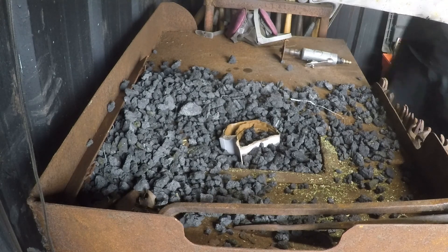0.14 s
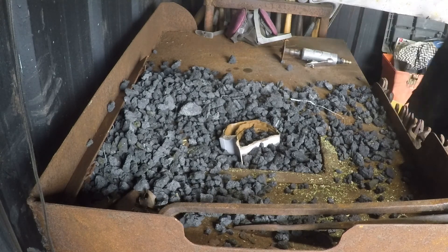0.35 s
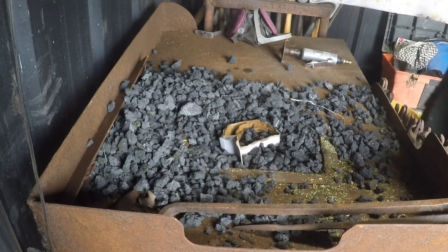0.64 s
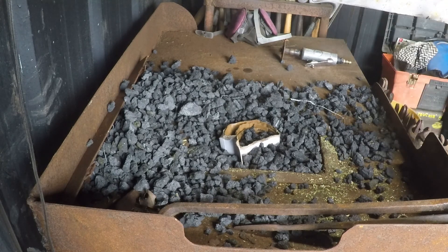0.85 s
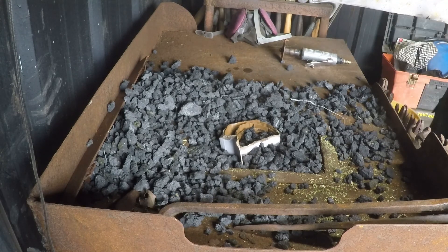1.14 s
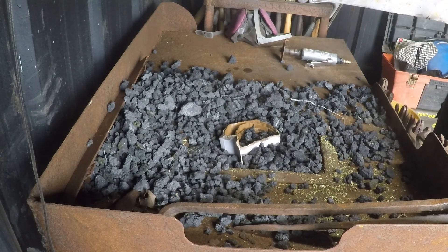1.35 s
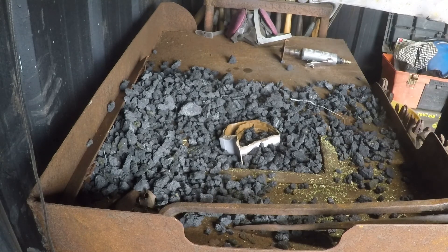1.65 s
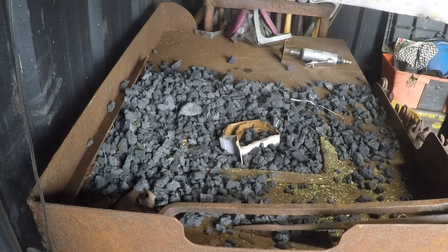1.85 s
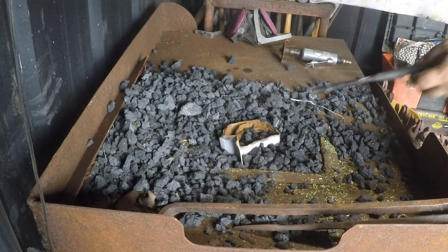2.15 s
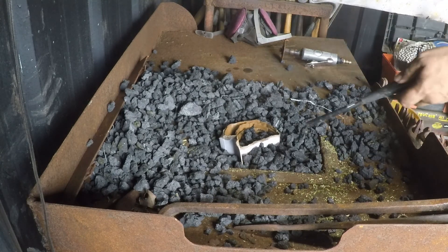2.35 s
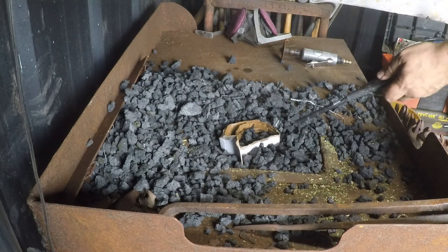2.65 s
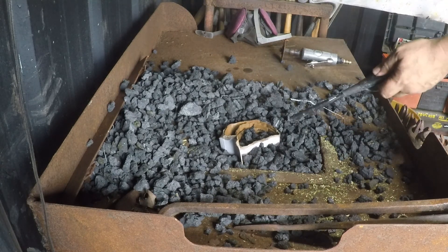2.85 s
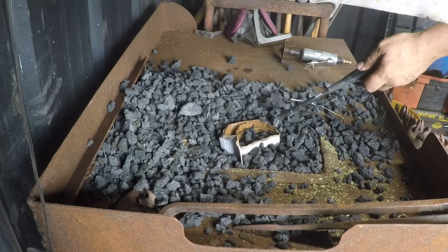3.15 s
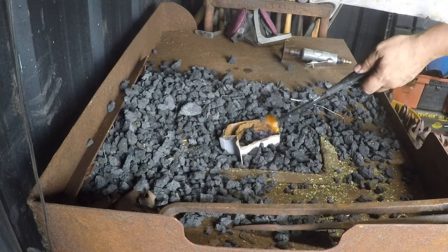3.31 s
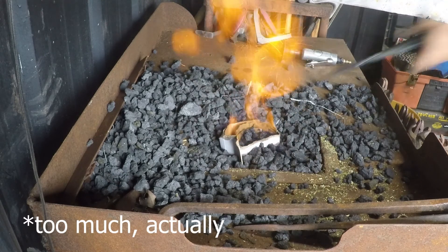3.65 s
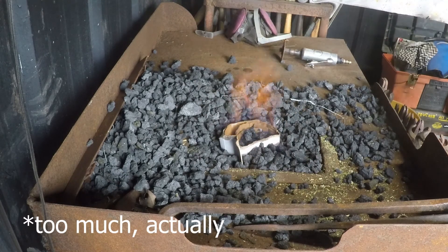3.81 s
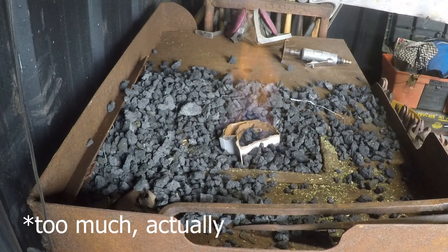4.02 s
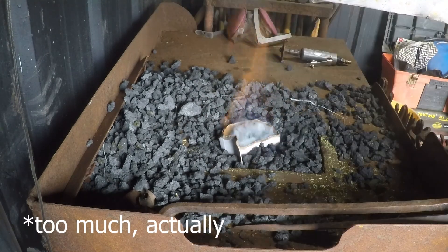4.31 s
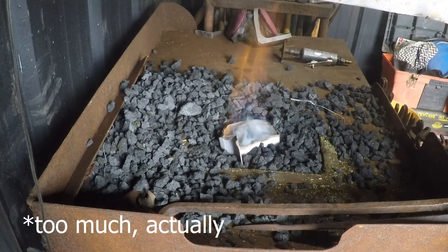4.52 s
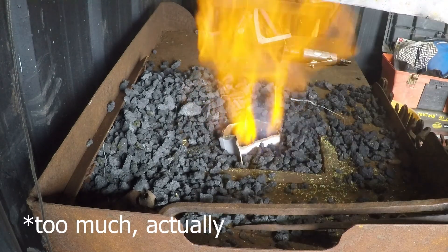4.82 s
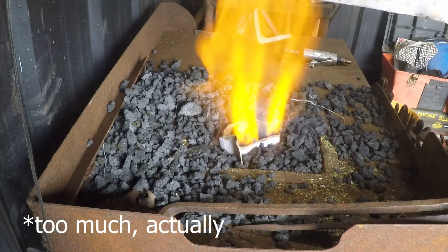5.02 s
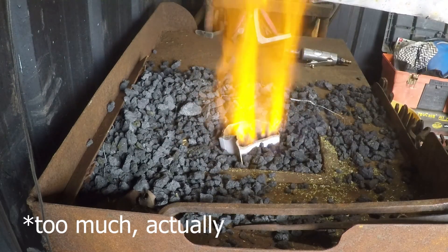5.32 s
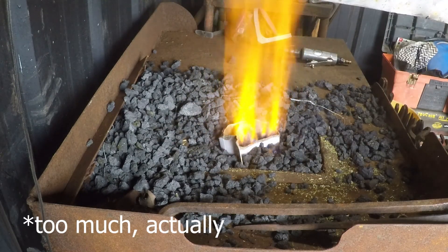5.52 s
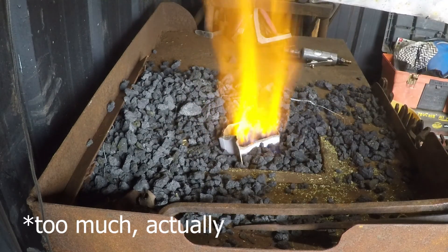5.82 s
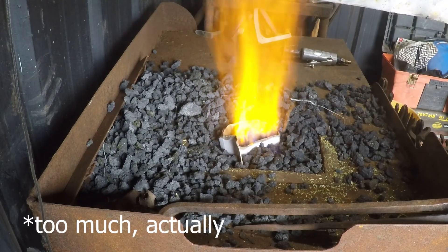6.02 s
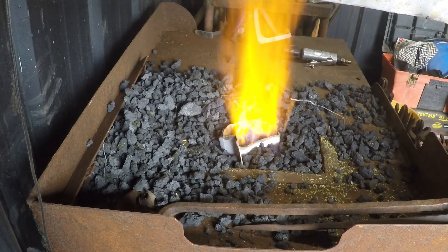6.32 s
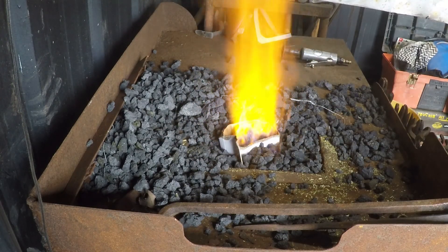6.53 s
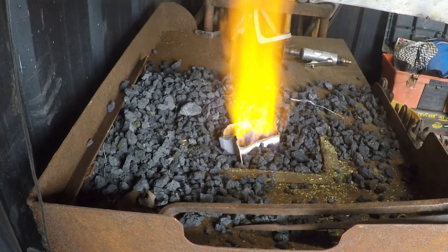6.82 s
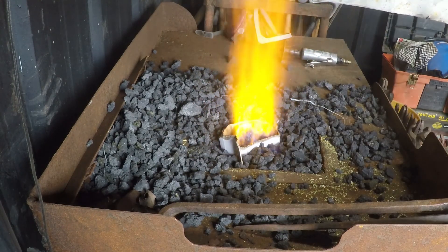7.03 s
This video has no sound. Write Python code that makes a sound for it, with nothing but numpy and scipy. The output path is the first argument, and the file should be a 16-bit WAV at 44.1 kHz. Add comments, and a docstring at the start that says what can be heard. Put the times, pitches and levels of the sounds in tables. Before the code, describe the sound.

A quiet, slightly echoing shed heard through a muffled close microphone: cloth and shoe rubs, tiny metal clinks, one can-like knock and a low footstep thud. Sharp plastic lighter snaps lead to a loud, low ignition thump that nearly overloads, leaving a soft flapping flame with a faint hum. After a firm switch clack, the blower rapidly swells into a loud, even, resonant rush of air lasting to the end.

```python
"""An electric blower roars through the pipe and fire of a coal forge in a tin shed: noise through resonances.
Before it, someone shuffles, knocks something hollow like a can, clinks iron and clicks a gas lighter:
noise strokes and decaying modes. The fuel catches in two thumps, short damped waves, and flutters as
patchy noise. A switch snaps, the blower runs up, the first air makes the fire whoosh and a dry click follows."""
import sys
import numpy as np
from scipy import signal
from scipy.fft import rfft, irfft, next_fast_len
from scipy.io import wavfile
from scipy.ndimage import uniform_filter1d, map_coordinates

SR = 44100
rng = np.random.default_rng(int(sys.argv[2]) if len(sys.argv) > 2 else 0)


def materialize(psi):
    """Save the field psi as 16-bit PCM at rate SR to the path in sys.argv[1].

    A 1-D psi becomes a single channel; in a 2-D psi each row is a channel.
    """
    bounded = np.clip(np.atleast_2d(psi).T, -1, 1)
    quanta = np.round(bounded * 32767).astype(np.int16)
    wavfile.write(sys.argv[1], SR, quanta)


def ratio_of_db(decibels):
    """Turn decibels (scalar or array-like) into linear amplitude factors; 0 dB maps to 1."""
    return 10 ** (np.asarray(decibels, float) / 20)


N = 315756
TIME = np.arange(N) / SR  # s


def unit(x):
    """Normalisation: scale to an rms of 1."""
    return x / np.sqrt(np.mean(x ** 2) + 1e-20)


def along(points, hz):
    """Logarithmic pitch: interpolate (Hz, value) points on a log frequency axis."""
    point_hz, value = np.transpose(points)
    return np.interp(np.log(hz + 1), np.log(point_hz + 1), value)


def wobble(rate):
    """Band-limited fluctuation: a smooth random curve with rate knots a second."""
    knots = rng.standard_normal(int(N * rate / SR) + 4)
    return map_coordinates(knots, [TIME * rate])


def filtered(x, response):
    """Linear filtering: multiply the spectrum by a response given as a function of frequency."""
    size = 2 * next_fast_len(len(x) // 2 + 4096)
    return irfft(rfft(x, size) * response(np.fft.rfftfreq(size, 1 / SR)), size)[:len(x)]


def rush(spectrum, patchy_db):
    """Turbulence: coloured noise of rms 1 whose gain varies in patches of time and frequency."""
    bins = signal.stft(rng.standard_normal(N), nperseg=512)[2]
    field = uniform_filter1d(rng.standard_normal(bins.shape), 5, 0)
    field = uniform_filter1d(field, 8, 1)
    patchy = signal.istft(bins * ratio_of_db(patchy_db * unit(field)), nperseg=512)[1][:N]
    return unit(filtered(patchy, lambda hz: ratio_of_db(along(spectrum, hz))))


def swell(s, rise, hold, t60):
    """Envelope: a linear rise, a hold, then exponential decay; all times in seconds."""
    gain, start = np.zeros(N), round(s * SR)
    t = np.arange(min(N - start, round((rise + hold + 1.5 * t60) * SR))) / SR
    fade_db = -60 * np.clip(t - rise - hold, 0, None) / t60
    gain[start:][:len(t)] = np.clip(t / rise, 0, 1) * ratio_of_db(fade_db)
    return gain


def run_up(half, tau):
    """Logistic growth: an S-shaped rise from 0 to 1, with half-way time and time constant in seconds."""
    return (1 + np.tanh((TIME - half) / (2 * tau))) / 2


# colour of the contact noise: pitch_hz, level_db (per Hz)
CRACK_COLOUR = [(120, -38.5), (400, -16), (1070, -9), (1700, -3), (2600, 0), (3500, 1.5), (5000, 0),
                (7000, 3), (10000, 4), (14000, -2)]
# reverberation of the shed: pitch_hz, t60_s
SHED_DECAY = [(200, 0.42), (600, 0.29), (1500, 0.49), (4000, 0.36), (10000, 0.27)]
# first echoes from the walls: delay_s, level_db
WALL_ECHOES = [(.0045, -12), (.009, -10), (0.0137, -18)]


def strike(s, db, modes, crack_db, crack_t60, rattle, room_db):
    """Modal impact: damped modes and contact noise, convolved with the room's impulse response."""
    longest = np.clip(max(crack_t60, *[t60 for _, _, t60 in modes]), .03, .5)
    t = np.arange(round(longest * SR)) / SR
    ring = np.zeros(len(t))
    for hz, level, t60 in modes:
        blur = rattle * np.cumsum(rng.standard_normal(len(t)))  # loose contact blurs the line
        decay = ratio_of_db(level + rng.normal(0, 2.5) - 60 * t / min(t60, .8))
        ring += decay * np.sin(2 * np.pi * hz * t + blur)
    grit = rng.standard_normal(len(t))
    grit[round(.0004 * SR)] += 8  # the first contact is one sharp spike
    crack = unit(filtered(grit, lambda hz: ratio_of_db(along(CRACK_COLOUR, hz))))
    crack = crack * ratio_of_db(crack_db - 60 * t / crack_t60)
    blow = ratio_of_db(db) * (ring + crack) * (1 - np.exp(-t / 0.00047))

    hz, frames, bins = signal.stft(rng.standard_normal(SR // 2), SR, nperseg=256)
    tail = signal.istft(bins * ratio_of_db(-60 * frames / along(SHED_DECAY, hz)[:, None]), SR, nperseg=256)[1]
    answer = np.pad(ratio_of_db(room_db) * tail / np.linalg.norm(tail), (round(.006 * SR), 0))
    answer[0] = 1  # direct sound
    for delay, wall_db in WALL_ECHOES:
        answer[round(delay * SR)] += ratio_of_db(wall_db)
    out = np.zeros(N + SR)
    out[round(s * SR):][:SR // 2] = signal.fftconvolve(blow, answer)[:SR // 2]
    return out[:N]


# resonances of air pipe and fire pot: pitch_hz, width_hz, level_db
PIPE_RESONANCES = [(145.6, 6.9, 7), (192.5, 14, -1), (250.4, 8.5, 10), (335.4, 5.2, 8.5), (420, 19.4, 7.5),
                   (520, 20, -6.5), (587, 13, 0.5), (632, 11.5, 13), (700, 10, 0), (892, 24.5, 5.5),
                   (990, 52, -8), (1072, 105, 0), (1242, 37, -0.5), (1432, 29, -4)]
# colour of the air before the pipe: pitch_hz, level_db (per Hz)
ROAR_COLOUR = [(53, -54), (90, 0), (140, -1.5), (416, -6), (532, -14), (906, -10), (2000, -15), (2600, -58),
               (4400, -120)]
# colour of the jet through the coal: pitch_hz, level_db (per Hz)
HISS_COLOUR = [(700, -56.5), (1200, -2), (1700, 4.5), (2600, 2), (3400, 3), (5000, -5), (12000, -11)]
# the fire flares in the first air, then sags before it settles: centre_s, width_s, level_db
FLARES = [(4.655, 0.044, 3.5), (4.76, 0.065, -2.5)]


def pipe_response(hz):
    """Resonance: direct air plus one second-order peak per mode of pipe and pot."""
    gain = 0.23
    for centre, width, db in PIPE_RESONANCES:
        gain = gain + ratio_of_db(db) * width * hz / np.abs(centre ** 2 - hz ** 2 + 1j * hz * width)
    return gain


def blower():
    """Forced turbulence: air excites the pipe resonances, the jet hisses through coal, the motor whines."""
    flare_db = sum(db * np.exp(-((TIME - s) / width) ** 2) for s, width, db in FLARES)
    roar = ratio_of_db(-24.5 + flare_db + .6 * wobble(4)) * run_up(half=4.637, tau=0.041)
    hiss = ratio_of_db(-35) * run_up(half=4.66, tau=0.056)
    gust = wobble(30)  # shared by air and jet
    air = unit(filtered(ratio_of_db(0.24 * gust) * rush(ROAR_COLOUR, patchy_db=0.5), pipe_response))
    jet = unit(ratio_of_db(0.11 * gust) * rush(HISS_COLOUR, patchy_db=1.3))
    whine_hz = 4386 + 4 * wobble(5.6)
    whine = ratio_of_db(-53 + 1.5 * wobble(6.7)) * np.sin(2 * np.pi * np.cumsum(whine_hz) / SR)
    return roar * air + hiss * jet + whine * hiss / hiss.max()  # the whine rises with the jet


# colour of the flare-up: pitch_hz, level_db (per Hz)
WHOOSH_COLOUR = [(400, -35), (650, -1.5), (900, 2.5), (1250, -3), (1800, -35)]


def whoosh():
    """Rapid combustion: vapour swept up by the first air burns off in one bright gust of noise."""
    centre_s, width_s = 4.66, 0.054
    gust = np.exp(-((TIME - centre_s) / width_s) ** 2)
    return ratio_of_db(-27) * gust * rush(WHOOSH_COLOUR, patchy_db=0.5)


# colour of the flapping flame: pitch_hz, level_db (per Hz)
FLUTTER_COLOUR = [(53, -18.5), (90, -1), (243, -4), (294, -10.5), (334, -14.5), (375, -13.5), (900, -29),
                  (1170, -24.5), (1980, -120)]
# the vapour catches in two puffs: start_s, level_db
CATCHING_PUFFS = [(3.283, -30), (3.39, -29)]
LIT_S, LIT_RISE_S = 3.3, 0.073  # the loose flame lights


def flame():
    """Unsteady combustion: the loose flame flaps as noise and makes the air pipe sing one note."""
    flutter = ratio_of_db(-43.5) * swell(LIT_S, LIT_RISE_S, hold=0.43, t60=2.1)
    for s, db in CATCHING_PUFFS:
        flutter = flutter + ratio_of_db(db) * swell(s, rise=0.016, hold=0.058, t60=0.41)
    flapping = unit(ratio_of_db(1.3 * wobble(25)) * rush(FLUTTER_COLOUR, patchy_db=3.5))
    song = ratio_of_db(-43.5) * swell(LIT_S, LIT_RISE_S, hold=0.32, t60=1.9)
    note_hz = 333 + 1.5 * wobble(11.0)
    note = np.sqrt(2) * np.sin(2 * np.pi * np.cumsum(note_hz) / SR)  # rms 1
    return flutter * flapping + song * note


# sudden pushes of air: start_s, level_db, pitch_hz, length_cycles (until about 20 dB down)
AIR_PUSHES = [(1.678, -20.5, 72.3, 2.2), (1.712, -24.5, 42.1, 5.6), (2.712, -43, 150, 5.3),
              (3.15, -38.5, 147, 4.3), (3.296, -18, 236, 2.9), (3.322, -6.5, 138, 2.85),
              (3.391, -15, 373, 8.2), (3.4032, 0.5, 98, 1.18), (3.418, -17, 105, 2.9),
              (3.464, -20, 196, 4.4)]


def thumps():
    """Damped oscillation: igniting vapour or a heavy step shoves the air for a few cycles."""
    out, t = np.zeros(N + SR), np.arange(SR // 2) / SR
    for s, db, hz, cycles in AIR_PUSHES:
        phase = t * hz  # cycles
        envelope = (1 - np.exp(-3 * phase)) * np.exp(-2.3 * phase / cycles)
        out[round(s * SR):][:len(t)] -= ratio_of_db(db) * np.sin(2 * np.pi * phase) * envelope
    return out[:N]


# modes of the blower switch: pitch_hz, level_db, t60_s
TOGGLE_MODES = [(695, -6, 0.032), (950, -15, 0.013), (1550, 3.5, 0.019), (2780, -9.5, 0.012),
                (3500, -4.5, 0.017), (4240, -1, 0.0093), (5300, 0, 0.0053)]


def switch():
    """Impact excitation: the toggle slams home and rings the short modes of its box."""
    return strike(4.3214, -20.5, TOGGLE_MODES, crack_db=5.5, crack_t60=0.0037, rattle=0.056, room_db=-7.5)


# modes of the second click: pitch_hz, level_db, t60_s
CLICK_MODES = [(1700, -12, .01), (3250, 3, 0.018), (3900, -9, .008), (5100, 0.5, .008)]


def click():
    """Heavily damped modes: a dry, high click after the switch, perhaps its release or a loose part."""
    return strike(4.7342, -14, CLICK_MODES, crack_db=1.5, crack_t60=0.0039, rattle=0.05, room_db=-17)


# lighter and small handling snaps: start_s, level_db, pitch_hz (reference for the plastic modes),
# overtone_db, crack_db (about the usual strength)
LIGHTER_SNAPS = [(1.768, -48, 1230, -7, 7), (2.057, -54, 1750, 11.5, 8), (2.2894, -51.5, 1810, 3, -5),
                 (2.3118, -50, 1704, -23, -11), (2.3687, -57, 1710, -18, -8), (2.598, -17.5, 1743, 2, -1),
                 (2.711, -35, 820, -2, -8), (2.724, -35, 910, 5, -10), (2.738, -37.5, 840, -1, -8),
                 (2.956, -52, 1070, -10, -9), (2.991, -40.5, 1730, 5, 0), (3.1485, -18, 1716, -17, 5),
                 (3.406, -34.5, 1700, 2, 2), (3.5304, -39, 1470, 11.5, 7.5)]
# modes of the plastic housing: ratio (multiple of the pitch), level_db, t60_s
PLASTIC_MODES = [(.42, -20, .01), (.7, -7.5, .01), (.9, -15.5, 0.016), (1.002, 3.5, 0.015),
                 (1.75, -2, 0.0093), (2.25, -11.5, 0.0083), (1.45, -8.5, .008), (2.95, -6.5, 0.0088)]


def snaps():
    """Released strain energy: a spring lets go and rings a small, heavily damped plastic housing."""
    out = np.zeros(N)
    for s, db, hz, overtone_db, crack_db in LIGHTER_SNAPS:
        modes = [(ratio * hz, level, t60) for ratio, level, t60 in PLASTIC_MODES]
        modes.append((1.93 * hz, overtone_db, .009))
        out += strike(s, db, modes, crack_db + 5.5, crack_t60=0.0032, rattle=0.077, room_db=-5.5)
    return out


# iron tools touching: start_s, level_db (ring), crack_db (scrape over ring), part (0 rod, 1 plate)
IRON_CLINKS = [(0.2207, -53, 16, 0), (0.249, -60, 13, 0), (.306, -58, 19, 0), (.358, -52.5, 20, 0),
               (0.431, -67, 12, 0), (3.786, -52, 13, 1), (3.801, -72, 6, 1), (3.92, -62, 10, 1),
               (3.96, -64, 3, 1)]
# modes of the iron rod: pitch_hz, level_db, t60_s
ROD_MODES = [(3720, 0, 0.23), (3060, 6, 0.1), (3430, 7.5, 0.17), (4129, 8.5, 0.24), (4900, 1, 0.17),
             (5430, 2.5, 0.22), (6115, 9.5, 0.18), (6830, 11, 0.17), (7600, 7, .18), (8700, 1, .2),
             (9300, 2, .2)]
# modes of the iron plate: pitch_hz, level_db, t60_s
PLATE_MODES = [(890, 5.5, 0.24), (1387, -2, 0.28), (1700, 1, 0.24), (2270, -11, .3), (2440, -4, .3),
               (2956, 2, 0.22), (3460, 0, 0.43), (4600, -5, 0.2), (5383, 1, 0.39), (6207, 3.5, 0.29),
               (11300, 11, .12)]


def clinks():
    """Lightly damped modes: iron on iron rings in thin high lines under a gritty scrape."""
    out = np.zeros(N)
    for s, db, crack_db, part in IRON_CLINKS:
        modes = [ROD_MODES, PLATE_MODES][round(part)]
        out += strike(s, db, modes, crack_db, crack_t60=0.06, rattle=0.083, room_db=-2.5)
    return out


# faint ringing under two scuffs, then one knock as a close pair: start_s, level_db (ring)
HOLLOW_RINGS = [(1.062, -76), (1.16, -49.5), (1.38, -34.5), (1.399, -36)]
# modes of the hollow, can-like ring: pitch_hz, level_db, t60_s (strike() caps it at 0.8)
HOLLOW_MODES = [(235, -3, 0.93), (262, -4.5, 1), (288.5, -6.5, 0.91), (350, -23, 0.15), (745, -9, 1),
                (842, -3.5, 0.29), (1172, 5, 0.089), (1490, 4, 0.088), (1683, -2.5, .14)]


def hollow_knock():
    """Modal ringing: one hollow, can-like knock near 1.38 s, with faint ringing under the scuffs before it."""
    return sum(strike(s, db, HOLLOW_MODES, crack_db=2.5, crack_t60=0.016, rattle=0.0724, room_db=1.0)
               for s, db in HOLLOW_RINGS)


# shoes and clothes rubbing, fire spitting: start_s, hold_s, t60_s, hiss_db, body_db
RUB_STROKES = [(0, 0.036, 1.3, -67.5, -56), (0.215, 0.019, 0.59, -46, -45), (0.345, 0.02, 0.23, -47, -48.5),
               (0.682, 0.02, 0.3, -57, -48.5), (0.706, 0.023, 0.39, -52.5, -47.5),
               (1.06, 0.11, .4, -64, -52.5), (1.153, 0.098, 0.55, -49.5, -42),
               (1.181, 0.078, 0.28, -44.5, -46.5), (1.373, 0.018, 0.32, -30.5, -30),
               (1.443, 0.032, 1.3, -66, -44.5), (1.6, .14, 0.54, -59, -54),
               (1.889, 0.033, 0.38, -65.5, -59), (2.012, 0.077, 0.41, -67.5, -64.5),
               (2.169, 0.04, .2, -64, -65), (2.235, 0.025, 0.6, -67.5, -59.5),
               (2.704, 0.026, 0.33, -52, -47), (2.934, 0.037, 0.43, -69, -72),
               (2.977, 0.037, 0.37, -57.5, -67), (3.297, 0.018, 0.076, -43.5, -25),
               (3.337, 0.029, .3, -56.5, -43), (3.388, 0.018, 0.21, -45, -33.5),
               (3.425, 0.068, 0.45, -46.5, -40), (3.519, 0.11, 0.93, -54, -47.5),
               (3.768, 0.015, 0.44, -54.5, -53), (3.921, 0.043, 1.4, -61, -58),
               (4.309, 0.034, 0.4, -52, -44)]
# colour of the hiss: pitch_hz, level_db (per Hz)
RUSTLE_COLOUR = [(600, -57), (1200, 1.5), (1700, 6.5), (2300, 4), (3700, 5.5), (5000, -3.5), (12000, -11)]
# colour of the body: pitch_hz, level_db (per Hz)
SCUFF_COLOUR = [(88, -48), (150, -1), (255, 4.5), (630, -4.5), (800, -1.5), (1070, -8.5), (1800, -14),
                (2340, -44), (3960, -120)]


def shuffle():
    """Friction noise: each stroke swells, holds and fades in the shed; rubbing comes in uneven grains."""
    hiss_power, body_power = np.zeros(N), np.zeros(N)
    for s, hold, t60, hiss_db, body_db in RUB_STROKES:
        power = swell(s, 0.0075, hold, t60) ** 2
        hiss_power += ratio_of_db(hiss_db) ** 2 * power
        body_power += ratio_of_db(body_db) ** 2 * power
    grain = ratio_of_db(1.65 * wobble(90))
    hiss = np.sqrt(hiss_power) * unit(grain * rush(RUSTLE_COLOUR, patchy_db=1.2))
    body = np.sqrt(body_power) * unit(grain * rush(SCUFF_COLOUR, patchy_db=1))
    return hiss + body


# low air pressure in the shed while someone walks about: time_s, level_db
STIRRED_AIR = [(0, -43), (0.46, -50.5), (0.9, -52), (1.65, -54), (1.85, -50), (2.3, -55.5), (3.2, -56),
               (7.16, -59.5)]
# colour of the low air movement: pitch_hz, level_db (per Hz)
LOW_COLOUR = [(8.8, -19), (15, 4.5), (70, 1), (244, -17), (288, -39.5), (330, -17), (400, -41.5),
              (520, -61), (880, -120)]


def rumble():
    """Low-frequency pressure: walking, the heaving flame and the blast move air below the pitch range."""
    stir_s, stir_db = np.transpose(STIRRED_AIR)
    stir = ratio_of_db(np.interp(TIME, stir_s, stir_db, -120, -120))
    heave = ratio_of_db(-35) * swell(LIT_S, LIT_RISE_S, hold=0.72, t60=1)
    blast = ratio_of_db(-36) * run_up(half=4.58, tau=0.029)
    return (stir + heave + blast) * unit(ratio_of_db(2.4 * wobble(6)) * rush(LOW_COLOUR, patchy_db=1.5))


# colour of the quiet background: pitch_hz, level_db (per Hz)
QUIET_COLOUR = [(47, -28), (80, 0), (170, -23.5), (330, -24.5), (550, -26), (800, -33), (1530, -33.5),
                (2960, -38), (3840, -33.5), (5070, -40), (6500, -46), (8300, -50), (9500, -43),
                (10500, -54.5), (11500, -79.5), (12500, -120)]


def background():
    """Stationary noise floor: faint, mostly low noise at a steady level."""
    return ratio_of_db(-60.5) * rush(QUIET_COLOUR, patchy_db=1.8)


def scene():
    """Superposition: the pressures of all sources in the shed add."""
    fire = blower() + whoosh() + flame() + thumps()
    handling = switch() + click() + snaps() + clinks() + hollow_knock() + shuffle()
    return (fire + handling + rumble())[None]


def causal(points):
    """Minimum phase: a response with these (Hz, dB) gains that never sounds before its cause."""
    def response(hz):
        cepstrum = irfft(np.log(ratio_of_db(along(points, hz))))
        half = len(cepstrum) // 2
        folded = np.r_[cepstrum[0], 2 * cepstrum[1:half], np.zeros(len(cepstrum) - half)]
        return np.exp(rfft(folded))
    return response


# treble loss of the housed microphone: pitch_hz, level_db
MICROPHONE_RESPONSE = [(3700, 0), (5000, -5), (7000, -11.5), (8500, -18), (10000, -30), (12000, -40.5),
                       (16000, -69.5)]


def microphone(sound):
    """Low-pass transduction: the housed microphone dulls the treble."""
    return filtered(sound, causal(MICROPHONE_RESPONSE))


def low_pass(x):
    """Removes everything above the highest recorded frequency."""
    return signal.sosfilt(signal.butter(12, 12016, fs=SR, output="sos"), x)


def record(dry):
    """Saturation: the input stage flattens the tallest peaks of microphone sound and background."""
    heard = microphone(dry[0]) + background()
    ceiling = .25
    flattened = heard / (1 + np.abs(heard / ceiling) ** 8) ** (1 / 8)
    return low_pass(flattened[None])


dry = scene()
out = record(dry)
materialize(out)
```